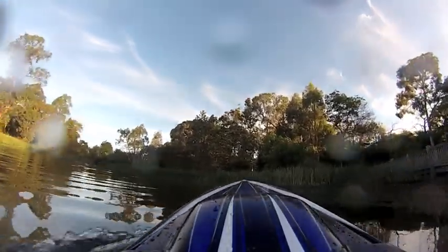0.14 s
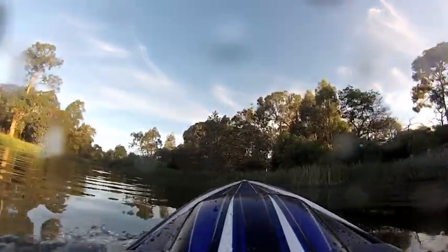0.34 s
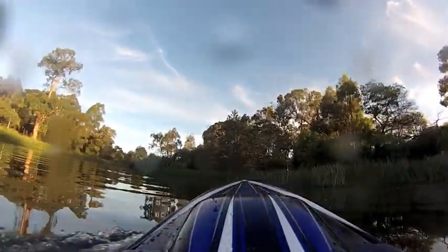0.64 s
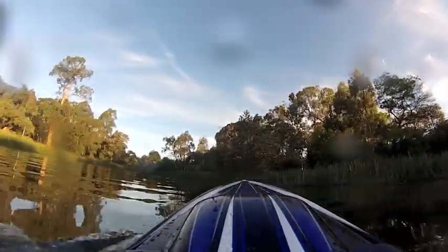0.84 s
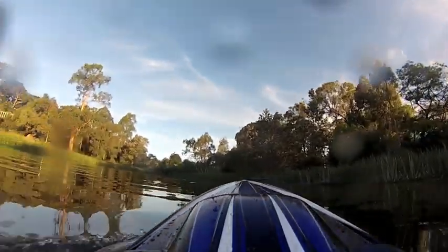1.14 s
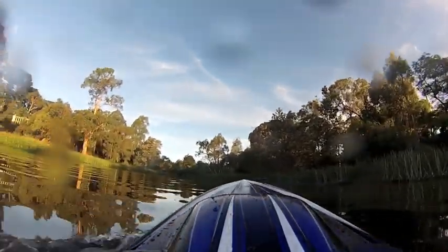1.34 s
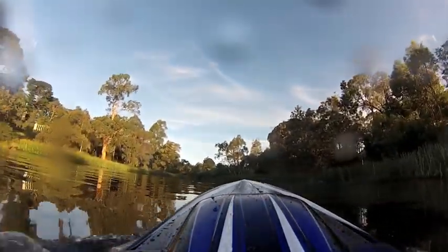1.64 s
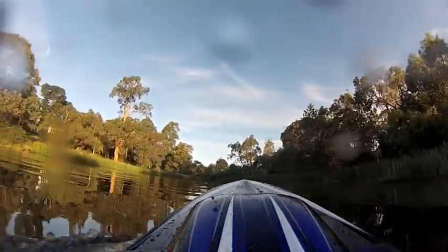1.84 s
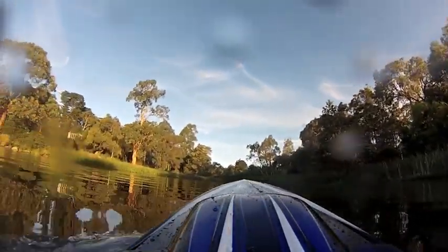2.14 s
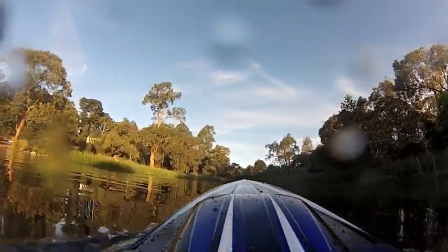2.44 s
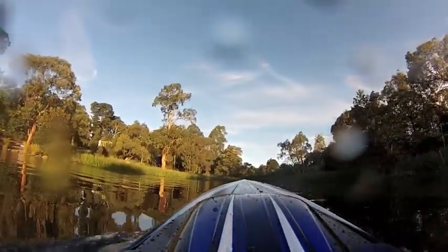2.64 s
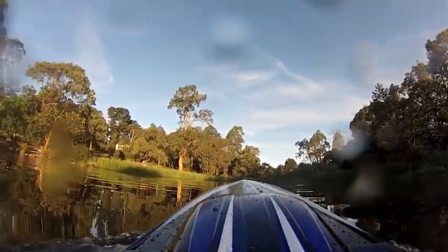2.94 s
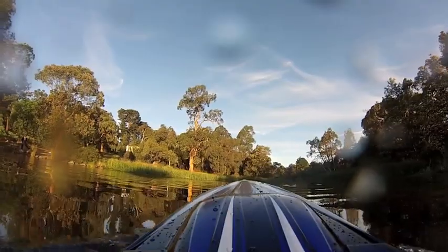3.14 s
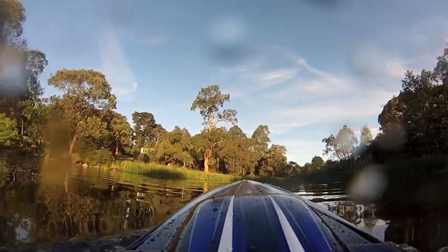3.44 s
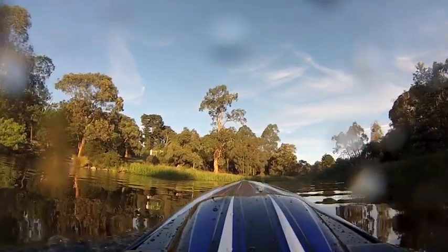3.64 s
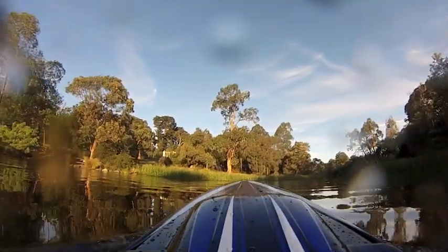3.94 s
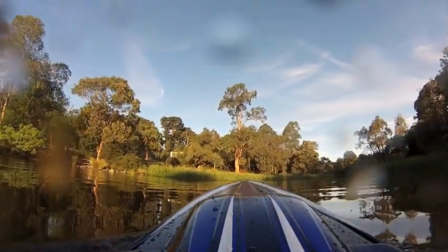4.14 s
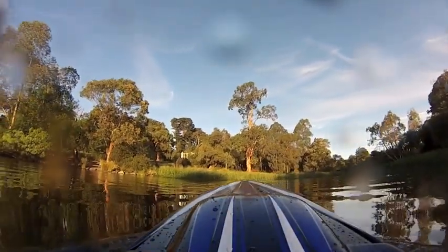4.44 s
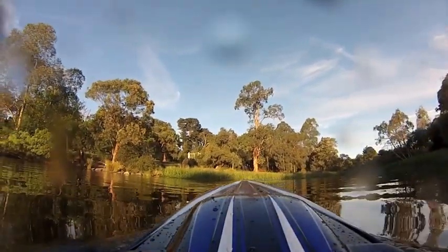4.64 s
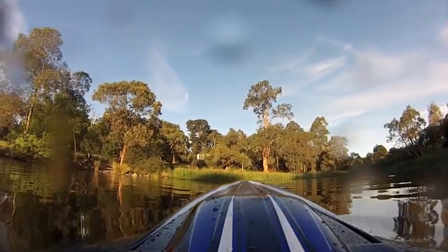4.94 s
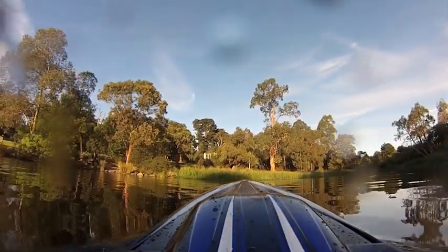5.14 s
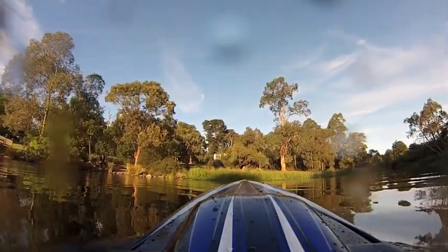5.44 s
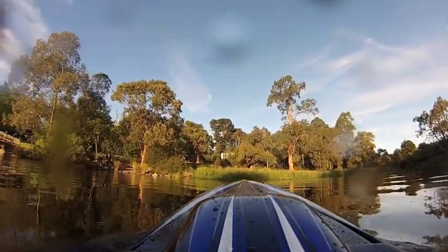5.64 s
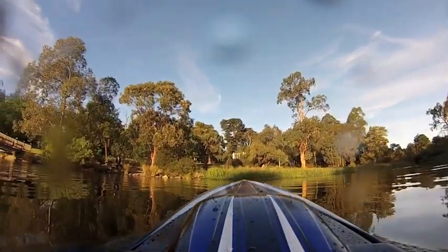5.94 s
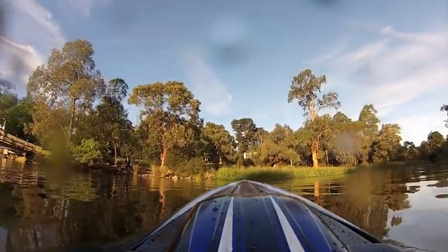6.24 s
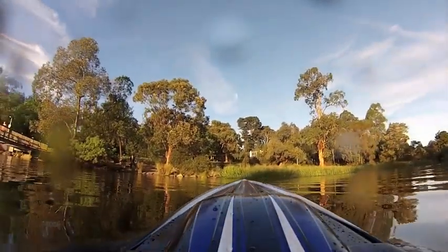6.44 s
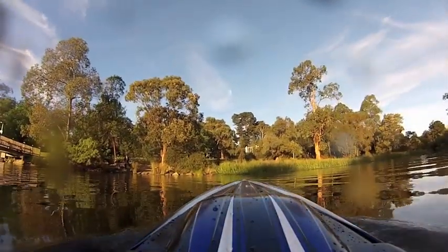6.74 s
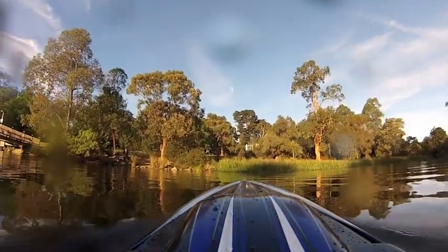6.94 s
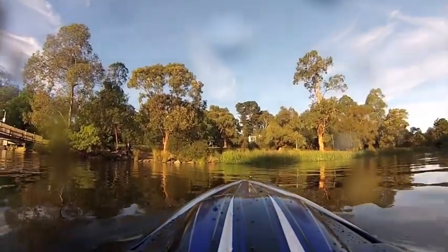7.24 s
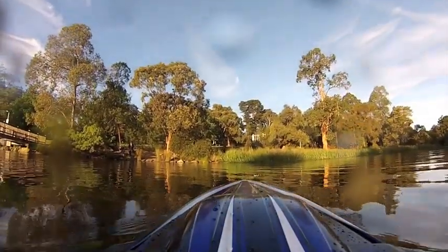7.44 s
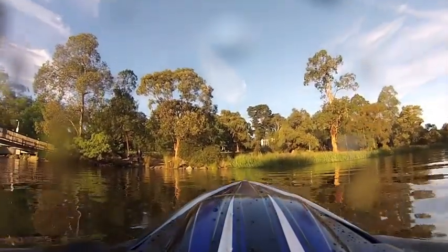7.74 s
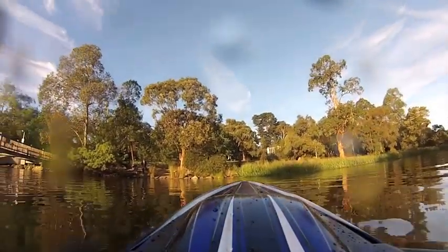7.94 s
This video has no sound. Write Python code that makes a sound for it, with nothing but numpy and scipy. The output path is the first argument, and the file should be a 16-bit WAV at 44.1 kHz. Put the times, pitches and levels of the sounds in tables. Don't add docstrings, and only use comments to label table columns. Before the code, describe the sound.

Electric model boat motor hums and buzzes through the hull over rushing water, slows, stops amid lapping and gurgling, then jerks back to speed.

```python
import sys
import numpy as np
from scipy import signal
from scipy.fft import rfft, irfft, next_fast_len
from scipy.io import wavfile
from scipy.ndimage import uniform_filter1d

SR = 44100
rng = np.random.default_rng(int(sys.argv[2]) if len(sys.argv) > 2 else 0)


def rack_gain(trim_db):
    fader = np.asarray(trim_db, float)
    return 10 ** (fader / 20)


def waveform_to_disk(signal):
    frames = np.transpose(np.atleast_2d(signal))
    scaled = np.clip(frames, -1, 1) * 32767
    samples = np.round(scaled).astype(np.int16)
    wavfile.write(sys.argv[1], SR, samples)


N = 356769
TIME = np.arange(N) / SR
POWER_OFF_S = 6.29


def evened(x):
    return x / np.sqrt(np.mean(x ** 2) + 1e-20)


def columns(rows):
    s, *values = np.transpose(rows)
    return [np.interp(TIME, s, v) for v in values]


def read(points, hz):
    f, value = np.transpose(points)
    return np.interp(np.log(hz + 1), np.log(f + 1), value)


def band(x, lo_hz, hi_hz):
    return signal.sosfilt(signal.butter(4, [lo_hz, hi_hz], "band", fs=SR, output="sos"), x)


def drift(top_hz):
    size = next_fast_len(N)
    hz = np.fft.rfftfreq(size, 1 / SR)
    gentle = 1 / np.sqrt(1 + (hz / top_hz) ** 2)
    steep = 1 / (1 + (hz / (4 * top_hz)) ** 4)
    noise = rfft(rng.standard_normal(size))
    return evened(irfft(noise * gentle * steep, size)[:N])


def colour(x, gain):
    log_gain = np.log(gain(abs(np.fft.fftfreq(16384, 1 / SR))) + 1e-5)
    taps = np.fft.ifft(np.exp(np.conj(signal.hilbert(log_gain)))).real[:4096]
    return signal.oaconvolve(x, taps)[:N]


def bump(s, width_s):
    return np.exp(-.5 * ((TIME - s) / width_s) ** 2)


# (time [s], new shaft speed [Hz], creep after it [Hz/s])
THROTTLE = [(0, 204.5, 0), (.485, 177.6, 24), (0.899, 187.3, 0), (1.45, 185.4, -12), (2.301, 168.9, -5),
            (2.751, 156.6, -3), (3.1, 152.7, -22), (3.3, 141.2, 0), (3.75, 133.3, -8), (4.29, 121.6, -16),
            (4.699, 135.7, -19), (4.83, 132, 24.5), (4.97, 134.8, 1), (5.571, 129.8, -8.5),
            (5.792, 125.3, -1)]
# (time [s], shaft speed [Hz], load [dB])
STOP = [
    (6.12, 122.8, 2.5),
    (6.213, 134.8, 0.5),
    (6.225, 146.1, -16),
    (6.26, 154, -1),
    (6.295, 143.5, -1.5),
    (6.325, 127.9, 1.5),
    (6.36, 97.47, -7),
    (6.5, 59.2, -28),
]
# (time [s], shaft speed [Hz], load [dB])
START = [
    (7.68, 60.5, -34.5),
    (7.75, 119.5, -12.5),
    (7.78, 126.3, 2.5),
    (7.82, 141.7, -6.5),
    (7.87, 136.6, -9),
    (7.925, 132, -3),
    (7.96, 171.6, -5.5),
    (8.03, 199.2, -7),
    (8.09, 211.6, -8),
]
# (time [s], level [dB])
SLIPS = [
    (4.359, -8.5),
    (4.589, -3.5),
    (5.601, -5),
]
SETTLE_S, SLIP_S = .07, 0.0083


def shaft():
    s, hz, creep = np.transpose(THROTTLE)
    k = np.searchsorted(s, TIME, "right") - 1
    running_hz = uniform_filter1d(hz[k] + creep[k] * (TIME - s[k]), round(SETTLE_S * SR))
    late_hz, late_db = columns(STOP + START)
    late = np.clip((TIME - STOP[0][0]) / SETTLE_S + 1, 0, 1)
    slip_db = sum(db * bump(at, SLIP_S) for at, db in SLIPS)
    return running_hz + late * (late_hz - running_hz), late * late_db + slip_db


def shaft_turns(hz):
    return np.cumsum(hz * (1 + .004 * drift(15))) / SR


# (frequency [Hz], width [Hz], level [dB])
HULL = [(132, 65, -12), (186, 23.4, -1.5), (262, 48, 0.5), (392.6, 63, -10.5), (442.3, 47, -14.5),
        (558, 18, -24), (692, 89, -16), (830.4, 98, -12), (1140, 200, -14), (1272, 88, -12),
        (1382, 110, -16.5), (1954, 150, -22), (2350, 560, -19), (2960, 260, -26.5), (3508, 160, -22),
        (3725, 390, -33.5), (4890, 240, -39.5), (5370, 720, -38.5), (6700, 950, -47.5), (8500, 400, -52.5),
        (11260, 1400, -54), (13700, 1400, -59)]
# (frequency [Hz], level [dB])
BETWEEN = [(40, -52.5), (100, -33.5), (210, -29.5), (600, -19.5), (1700, -25), (3300, -31), (4310, -38.5),
           (8300, -55.5), (15500, -84.5)]
# (frequency [Hz], width [Hz], level [dB])
NOTCHES = [(187, 5.8, 1.5), (795, 12, -5.5), (1480, 71, 0), (2557, 87, -15.5), (4307, 234, -15.5),
           (5080, 88, -9), (7830, 600, -1.5), (8500, 300, -12.5), (9400, 800, -1), (13000, 350, -8),
           (14600, 400, -9)]


def hull(hz):
    modes = sum(rack_gain(db) ** 2 / (1 + (2 * (hz - f) / width) ** 2) ** 2 for f, width, db in HULL)
    dips_db = sum(db / (1 + (2 * (hz - f) / width) ** 2) for f, width, db in NOTCHES)
    return np.sqrt(modes + rack_gain(read(BETWEEN, hz)) ** 2) * rack_gain(dips_db)


# (frequency [Hz], level [dB])
UNBALANCE = [(95, -29), (130, -41), (145, -33), (158, -31.5), (170, -23), (180, -19.5), (188, -17),
             (202, -24.5)]
BLADES = [(190, -34), (235, -16), (255, -14), (270, -13.5), (282, -17.5), (312, -23), (345, -30),
          (400, -40.5)]
FOURTH = [(470, -38), (530, -48), (620, -50), (680, -37), (720, -31), (750, -35), (805, -31)]
SIXTH = [(760, -46), (900, -47.5), (1040, -47), (1110, -40), (1130, -35), (1230, -41)]
# (multiple of the shaft speed, level [dB])
WEAK_ORDERS = [(3, 0), (5, -4.5), (8, -9), (11, -2.5), (12, -2.5), (13, -6)]


def motor(hz, load_db, turns, churn_db):
    strong = 0
    for k, deck, waver_db in [(1, UNBALANCE, 1.0), (2, BLADES, .7), (4, FOURTH, 1.2), (6, SIXTH, 1.5)]:
        level_db = read(deck, k * hz) + load_db + waver_db * drift(5) + .9 * drift(25)
        strong = strong + rack_gain(level_db) * np.cos(2 * np.pi * k * turns)
    weak = 0
    for k, db in WEAK_ORDERS:
        weak = weak + rack_gain(db + 2.6 * drift(3.3)) * np.cos(2 * np.pi * (k * turns + rng.random()))
    turning = np.clip(hz / 40 - 1.6, 0, 1)
    return np.sqrt(2) * strong + rack_gain(churn_db + 6.5) * turning * colour(weak, hull)


def surge_db(s, db, rise_s, hold_s, fall_s):
    return db - 20 * np.maximum(np.maximum((s - TIME) / rise_s, (TIME - s - hold_s) / fall_s), 0)


def power_sum_db(levels_db):
    return 10 * np.log10(sum(rack_gain(db) ** 2 for db in levels_db) + 1e-20)


# (time [s], churn [dB], spray thrown up [dB])
WAKE = [(0, -22, 0), (.45, -25, 1.5), (.91, -23.6, 0.4), (1.91, -24, 2), (2.91, -24.5, 4.5),
        (3.26, -24.5, 5.5), (4.05, -26.5, 2.5), (4.4, -27, -7.5), (4.64, -26, -6.5), (4.72, -28.5, 0),
        (5.17, -29, 2.5), (5.6, -27.5, 0), (5.95, -26.5, 6.5), (6.24, -27, 8.5), (6.31, -23, 1)]
# (time [s], level [dB])
LULLS = [
    (5.48, -5.5),
    (5.79, -8),
    (5.92, -10),
    (6.03, -8.5),
    (6.13, -11),
]
# (time [s], churn [dB], rise [s], fall [s], spray [dB])
LAPS = [
    (6.897, -56, 0.13, .07, 21),
    (6.962, -53, 0.012, 0.48, 5.5),
    (7.114, -47, 0.42, .1, 9.5),
    (7.169, -40, 0.11, 0.059, -7.5),
    (7.252, -46.5, 0.24, 0.19, -16),
    (7.754, -24, 0.043, 0.047, -19.5),
    (7.985, -31.5, 0.22, 0.019, -19.5),
]
# (time [s], churn [dB], hold [s], spray [dB])
BITES = [
    (7.761, -43, .3, -20),
    (7.763, -38, .025, 17),
    (7.789, -42.5, .07, 8),
    (7.954, -33.5, .032, 19),
    (7.99, -31, .1, -19.5),
    (8.028, -28.5, .07, 12.5),
]
LULL_S, BITE_RISE_S, BITE_FALL_S, DRUM_HOLD_S = 0.038, 0.0053, .015, 0.27
FLICKER_DB, FLICKER_FROM_S = 2.2, 3.0
FIZZ_DB, FIZZ_SHARE, SPRAY_DB, DRUM_DB, DRUM_SHARE = -24.5, 0.65, -38.5, -1.13, 0.165
FADE_DB_PER_S, SPRAY_FADE_DB_PER_S = 98.5, 151.5
STILL_DB, LAP_DRUM_DB, BITE_DRUM_DB = -64.5, -6, 4.5


def wake():
    churn_db, thrown_db = columns(WAKE)
    after = np.maximum(TIME - POWER_OFF_S, 0)
    wet_db = thrown_db + sum(db * bump(s, LULL_S) for s, db in LULLS)
    wet_db = wet_db - np.minimum(SPRAY_FADE_DB_PER_S * after, 14)
    wet_db = wet_db + FLICKER_DB * np.clip(TIME - FLICKER_FROM_S, 0, 1) * drift(30)
    drum_db = churn_db + DRUM_DB + DRUM_SHARE * thrown_db + 0.3 * drift(6.0) - 10 * (after / DRUM_HOLD_S) ** 4

    events = [(STILL_DB, 10)]
    events += [(surge_db(s, db, rise, 0, fall), wet) for s, db, rise, fall, wet in LAPS]
    events += [(surge_db(s, db, BITE_RISE_S, hold, BITE_FALL_S), wet) for s, db, hold, wet in BITES]
    parts = [(churn_db - FADE_DB_PER_S * after, wet_db)] + events

    churn = power_sum_db([db for db, wet in parts])
    event_drum_db = np.where(TIME > START[0][0], BITE_DRUM_DB, LAP_DRUM_DB)
    drum = power_sum_db([drum_db, power_sum_db([db for db, wet in events]) + event_drum_db])
    fizz = power_sum_db([db + FIZZ_DB + FIZZ_SHARE * wet for db, wet in parts])
    spray = power_sum_db([db + SPRAY_DB + wet for db, wet in parts])
    return churn, fizz - churn, drum, spray - churn


def bubbles(count=24):
    size = (rng.random(N) < 850 / SR) * rack_gain(4.2 * np.minimum(rng.exponential(1, N), 4))
    kind, t = rng.integers(0, count, N), np.arange(900) / SR
    gurgle = 0
    for k, hz in enumerate(np.geomspace(650, 3000, count)):
        ring = np.sin(2 * np.pi * hz * t * (1 + 2.4 * t)) * np.exp(-t * hz / 5)
        ring = ring * np.minimum(t / 0.00077, 1) * (hz / 500) ** -.6
        gurgle = gurgle + signal.oaconvolve(size * (kind == k), ring)[:N]
    return evened(gurgle)


def water(hz, turns, churn_db, fizz_db, drum_db, spray_db):
    pace = hz / 190
    rush = rng.standard_normal(N) * rack_gain(0.53 * drift(8.2) + 2.0 * drift(230))
    crowd = pace ** 1.8 * rack_gain(3.2 * drift(12))
    on_blade = np.maximum(1 + .7 * np.cos(4 * np.pi * turns) + .25 * np.cos(2 * np.pi * turns), 0)
    tick_now = rng.random(N) < 1800 / SR * crowd * on_blade
    ticks = tick_now * rng.standard_normal(N) * rack_gain(1.74 * np.minimum(rng.exponential(1, N), 5))
    rush = colour(evened(rush), hull)
    ticks = colour(evened(ticks / pace), hull)

    def part(lo_hz, hi_hz, fast, slow):
        share = np.clip(slow + (fast - slow) * pace, 0, .9) * np.clip(3 * pace - .6, 0, 1)
        steady = np.sqrt(1 - share) * evened(band(rush, lo_hz, hi_hz))
        return steady + np.sqrt(share) * evened(band(ticks, lo_hz, hi_hz))

    resting = np.clip(2.3 - 4.5 * pace, 0, .88)
    gurgle = evened(bubbles() + .55 * part(500, 2300, .1, .3))
    churn = np.sqrt(1 - resting) * part(500, 4260, 0.13, 0.28) + np.sqrt(resting) * gurgle
    drum = rack_gain(drum_db + 2.0) * part(90.5, 489, 0.14, 0.085)
    fizz = rack_gain(fizz_db + 0.9) * part(4210, 8280, 0.3, 1.25)
    spray = rack_gain(spray_db + 0.4) * part(8200, 16000, 0.35, 1.8)
    return drum + rack_gain(churn_db - 0.8) * churn + rack_gain(churn_db) * (fizz + spray)


# (time [s], peak level [dB], bubble pitch [Hz], tick level over the ring [dB])
SLAPS = [(.179, -17, 810, 37), (.509, -20, 1280, 37), (0.834, -9, 807, 46), (4.467, -19, 1250, 41),
         (4.645, -21, 1380, 37), (5.981, -18.5, 700, 46), (6.662, -49.5, 650, 42), (6.745, -49, 2310, 33.5),
         (6.785, -44.5, 1340, 40.5), (6.813, -45, 2320, 33), (7.023, -36.5, 1130, 36.5),
         (7.043, -38.5, 2100, 34), (7.394, -50.5, 826, 34), (7.687, -48, 2820, 40.5),
         (6.963, -27.5, 796, 32), (7.031, -37, 605, 44.5), (7.054, -34, 1350, 51.5),
         (7.096, -28.5, 2085, 40.5), (7.117, -43.5, 1158, 41), (7.137, -27, 1160, 42),
         (7.162, -26, 716, 32), (7.164, -23.5, 1070, 33), (7.169, -27.5, 253, 29.5), (7.221, -37, 820, 30),
         (7.242, -31.5, 1080, 28), (7.27, -34, 1290, 33), (7.364, -34, 402, 28), (7.708, -33, 1690, 40),
         (7.756, -9.5, 1148, 33.5), (7.958, -15.5, 1233, 43.5)]
SLAP_T60_S, PUFF_DB, PUFF_T60_S = .036, -21, 0.037


def slaps():
    rings, ticks, t = np.zeros(N + SR), np.zeros(N + SR), np.arange(SR // 5) / SR
    for s, db, hz, tick_db in SLAPS:
        at = round(s * SR)
        ring = np.sin(2 * np.pi * hz * t * (1 + 1.0 * t)) * np.minimum(t / 0.002, 1)
        rings[at:at + len(t)] += rack_gain(db - 60 * t / SLAP_T60_S) * ring
        ticks[at] += rack_gain(db + tick_db)
        puff = rack_gain(db + tick_db + PUFF_DB - 60 * t / PUFF_T60_S) * rng.standard_normal(len(t))
        ticks[at:at + len(t)] += puff
    return rings[:N] + band(colour(np.diff(ticks), hull), 350, 5200)


# (time [s], peak level [dB])
SPITS = [(3.4197, -37), (3.4731, -35.5), (3.5029, -37.5), (3.6066, -38.5), (3.6571, -35), (3.7647, -37),
         (3.9611, -38), (4.045, -42), (4.079, -38), (4.1088, -42.5), (4.1371, -41), (4.1539, -41.5),
         (4.1982, -41.5), (4.2963, -45), (4.3173, -42.5), (4.4111, -48.5), (4.4549, -46), (4.5795, -43.5),
         (4.6777, -47), (4.7016, -44), (4.8208, -45), (4.8566, -43.5), (4.9445, -39.5), (4.9688, -43),
         (5.0264, -44), (5.0751, -43.5), (5.1156, -46.5), (5.1664, -38.5), (5.2105, -46), (5.2245, -38.5),
         (5.2492, -38), (5.2772, -43), (5.3004, -41.5), (5.3837, -42.5), (5.399, -42.5), (5.434, -40),
         (5.5075, -45), (5.5422, -43.5), (5.5594, -41.5), (5.629, -40.5), (5.654, -47.5), (5.667, -40.5),
         (5.7004, -43.5), (5.7433, -47.5), (5.8217, -40.5), (5.8479, -41.5), (5.9374, -38), (6.0317, -41.5),
         (6.067, -41.5), (6.0966, -38.5), (6.1307, -46.5), (6.144, -43.5), (6.1591, -41.5), (6.1848, -40),
         (6.2075, -37.5), (6.2246, -37.5)]
SPIT_DB, SPIT_T60_S, SPIT_LO_HZ = -2.5, .025, 4600


def spits():
    starts, t = np.zeros(N), np.arange(SR // 20) / SR
    s, db = np.transpose(SPITS)
    starts[np.round(s * SR).astype(int)] = rack_gain(db + SPIT_DB)
    shape = signal.oaconvolve(starts, rack_gain(-60 * t / SPIT_T60_S))[:N]
    noise = rng.standard_normal(N)
    scale = np.std(band(colour(noise, hull), 6000, 15000))
    return band(colour(shape * noise, hull), SPIT_LO_HZ, 16000) / scale / 2


# (time [s], peak level [dB], centre frequency
# [Hz])
DROPS = [(6.627, -58, 5100), (6.663, -62, 4800), (6.68, -66, 5300), (6.77, -61, 3700), (6.955, -62, 5500),
         (7.957, -36, 4200), (7.99, -47, 6300), (8.04, -35, 5400), (7.3, -50, 4900), (7.12, -52.5, 4560),
         (7.05, -54, 3500), (7.138, -37, 1800), (7.161, -39, 4280), (7.244, -49, 3300), (7.323, -62, 4000),
         (6.988, -48, 2600), (9, -46, 11400), (8.086, -35, 13000), (8.086, -36, 6400), (8.086, -35.5, 4800)]
DROP_T60_S = 0.023


def drops():
    out, t = np.zeros(N + SR), np.arange(SR // 20) / SR
    for s, db, hz in DROPS:
        at = round(s * SR)
        snap = evened(band(rng.standard_normal(len(t)), hz / 1.4, hz * 1.4))
        out[at:at + len(t)] += rack_gain(db - 60 * t / DROP_T60_S) * snap
    return out[:N]


def tone(rows, parts, rough_db, wobble):
    hz, db = columns(rows)
    inside = (TIME > rows[0][0]) * (TIME < rows[-1][0])
    turns = np.cumsum(hz * (1 + wobble * drift(280))) / SR
    partials = sum(rack_gain(d) * np.sqrt(2) * np.sin(2 * np.pi * k * turns) for k, d in parts)
    return inside * rack_gain(db + rough_db * drift(120)) * partials


# (time [s], frequency [Hz], level
# [dB], rise [s], fall [s])
RINGS = [(0.531, 183, -18, 0.034, 0.13), (7.77, 180, -17, .03, .03), (2.55, 258, -19.5, 0.15, 0.13),
         (3.09, 242.3, -17, 0.063, 0.09), (6.459, 270, -24, 0.042, 0.068), (6.615, 261, -36, 0.031, 0.037),
         (6.88, 186, -44.5, 0.23, 0.21), (7.75, 1172, -24.5, 0.023, 0.066), (7.83, 138, -17, 0.071, 0.19),
         (7.885, 1149, -32, 0.03, .03), (7.93, 402, -30, 0.14, 0.05), (7.972, 185, -16.5, 0.024, .05),
         (7.978, 250, -15, .02, .015), (8.05, 410, -24, 0.027, .04), (8.031, 250, -12.5, 0.05, .03)]


def panel_rings():
    out = 0
    for s, hz, db, rise, fall in RINGS:
        rows = [(s - 2 * rise, hz, db - 39.0), (s, hz, db), (s + 2 * fall, hz, db - 40.5)]
        out = out + tone(rows, [(1, 0)], rough_db=1.2, wobble=.02)
    return out


# (time [s], frequency [Hz], level [dB])
BEAT = [
    (.7, 80, -62),
    (.9, 80.8, -48),
    (1.6, 78.9, -43.5),
    (2.2, 79, -50),
    (2.75, 82.5, -64),
]


def low_tone():
    return tone(BEAT, [(1, 0)], rough_db=2.5, wobble=.06)


# (time [s], frequency [Hz], level [dB])
WHINE = [
    (7.535, 3410, -74),
    (7.55, 3410, -61),
    (7.62, 3410, -65),
    (7.68, 3410, -61),
    (7.69, 3410, -52),
    (7.74, 3410, -42),
    (7.755, 3410, -60),
]
# (multiple, level [dB])
WHINE_PARTS = [(1, 0), (1.5, -18), (2, -22)]
# (time [s], frequency [Hz], level [dB])
SWITCHING = [
    (0, 5746, -72),
    (6.3, 5746, -70),
    (6.35, 5746, -90),
]


def controller():
    stalled = tone(WHINE, WHINE_PARTS, rough_db=5.0, wobble=.012)
    return stalled + tone(SWITCHING, [(1, 0)], rough_db=2.0, wobble=.001)


# (time [s], frequency [Hz], level [dB])
WHIR = [
    (6.78, 1950, -68),
    (6.815, 2250, -58),
    (6.835, 1980, -60),
    (6.845, 2120, -43),
    (6.862, 2370, -46),
    (6.88, 2400, -50),
    (6.905, 2330, -47),
    (6.925, 1980, -60),
    (6.94, 1950, -68),
]
# (multiple, level [dB], pitch wobble [fraction])
GEAR_PARTS = [(.58, -10, .05), (1, 0, .032), (1.2, -4, .032), (1.5, -16, .08), (2.15, -21, .1)]
# (shift [s], level [dB], roughness [factor])
STEERS = [
    (-.385, -5, 1.6),
    (0, 1.5, 1.0),
]
# (time [s], frequency [Hz], level [dB])
WHIR_HUM = [
    (6.84, 262, -59),
    (6.87, 253, -36.5),
    (6.9, 280, -33),
    (6.93, 266, -39),
    (6.96, 262, -66),
]


def rudder_gear():
    out = tone(WHIR_HUM, [(1, 0)], rough_db=1.2, wobble=.02)
    for shift, by_db, rough in STEERS:
        rows = [(s + shift, hz, db + by_db) for s, hz, db in WHIR]
        for k, db, wobble in GEAR_PARTS:
            out = out + tone(rows, [(k, db)], rough_db=5.0, wobble=wobble * rough)
    return out


LURCH_S, LURCH_HZ, LURCH_DB, LURCH_RISE_S, LURCH_T60_S = 7.735, 24, -7, .02, .36


def lurch():
    t = np.maximum(TIME - LURCH_S, 0)
    swing = np.minimum(t / LURCH_RISE_S, 1) * np.sin(2 * np.pi * LURCH_HZ * t)
    return rack_gain(LURCH_DB - 60 * t / LURCH_T60_S) * swing


# (time [s], level [dB])
SWELL = [(0, -37), (.3, -55.5), (6, -50.5), (6.3, -48), (6.6, -35), (6.9, -45), (7.25, -34), (7.6, -44.5),
         (7.72, -43), (7.81, -38), (7.9, -25), (8.09, -26)]


def swell():
    turns = np.cumsum(23 + 2 * drift(2)) / SR
    heave = np.sin(2 * np.pi * turns) * rack_gain(4 + 2.5 * drift(3))
    rumble = evened(band(rng.standard_normal(N), 20, 48))
    return rack_gain(columns(SWELL)[0]) * (heave + np.where(TIME < POWER_OFF_S, 1.3, .3) * rumble)


# (frequency [Hz], level per Hz [dB])
FLOOR = [(40, -11), (100, -6), (200, -5), (300, -14), (600, -28), (4000, -31), (8000, -32), (15500, -38)]
FLOOR_DB = -59


def noise_floor():
    return rack_gain(FLOOR_DB) * evened(colour(rng.standard_normal(N), lambda hz: rack_gain(read(FLOOR, hz))))


def scene():
    hz, load_db = shaft()
    turns = shaft_turns(hz)
    wake_levels = wake()
    mix = motor(hz, load_db, turns, wake_levels[0]) + water(hz, turns, *wake_levels)
    mix = mix + slaps() + spits() + drops()
    mix = mix + panel_rings() + low_tone() + controller() + rudder_gear()
    mix = mix + lurch() + swell() + noise_floor()
    return mix[None]


def top_cut(x):
    return signal.sosfilt(signal.butter(12, 15270, fs=SR, output="sos"), x)


def record(dry):
    mix = np.tanh(dry / 1.3) * 1.3
    return top_cut(mix)


dry = scene()
out = record(dry)
waveform_to_disk(out)
```